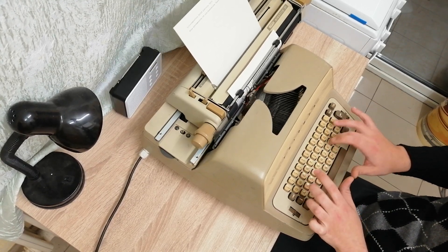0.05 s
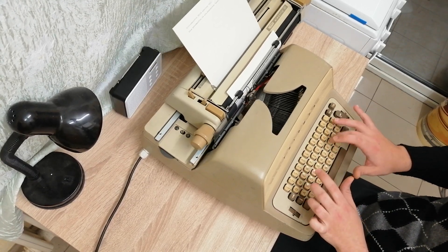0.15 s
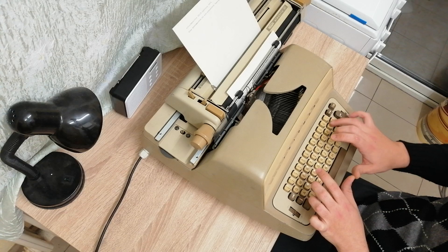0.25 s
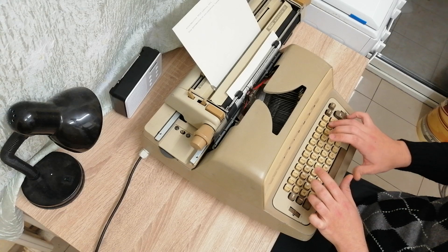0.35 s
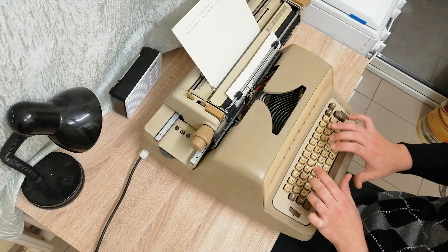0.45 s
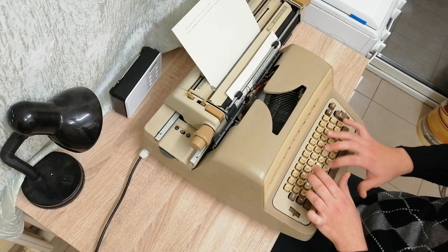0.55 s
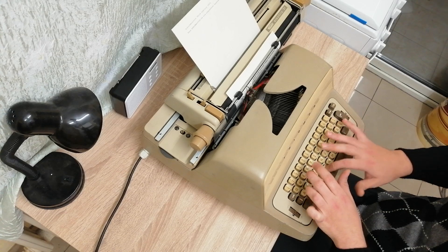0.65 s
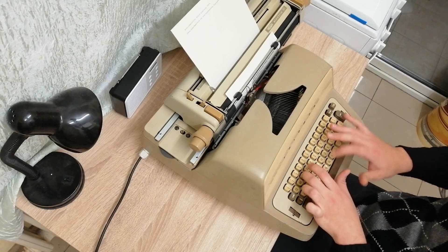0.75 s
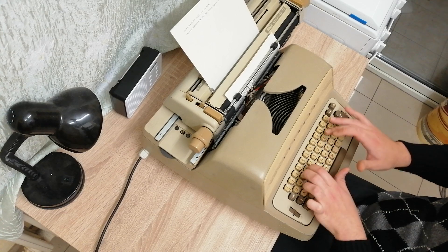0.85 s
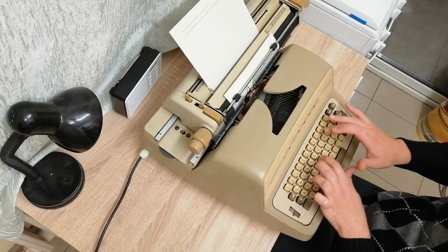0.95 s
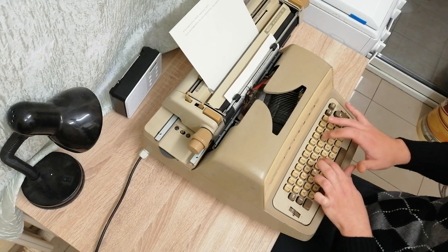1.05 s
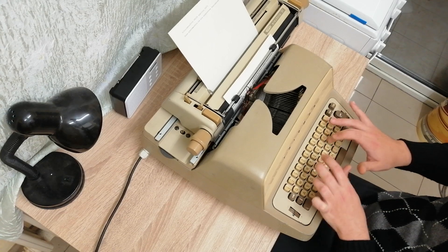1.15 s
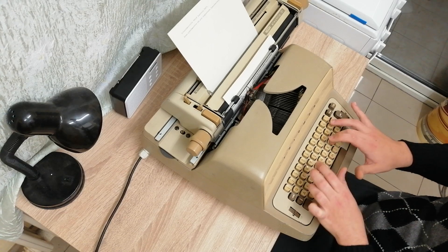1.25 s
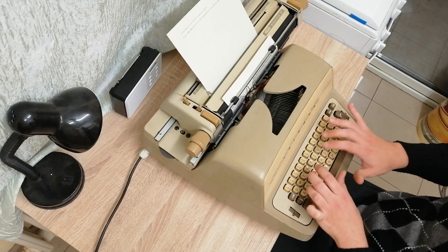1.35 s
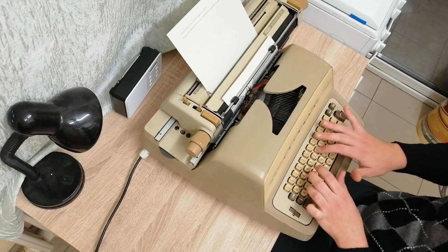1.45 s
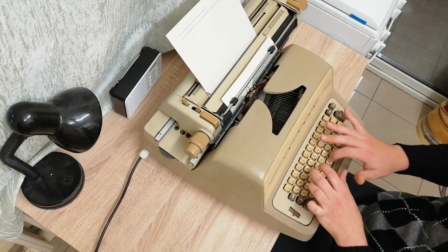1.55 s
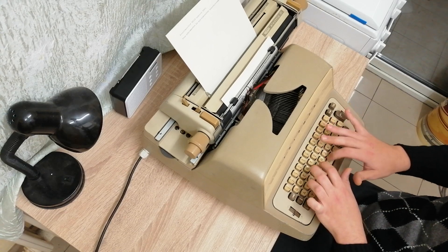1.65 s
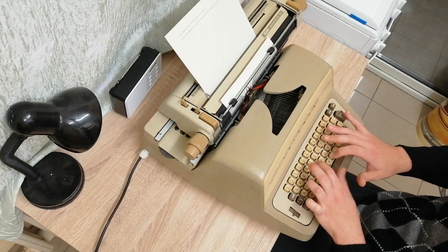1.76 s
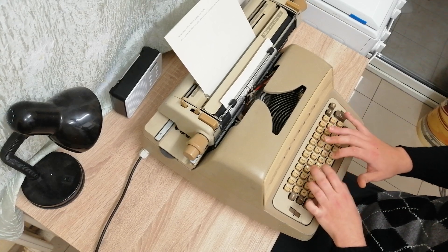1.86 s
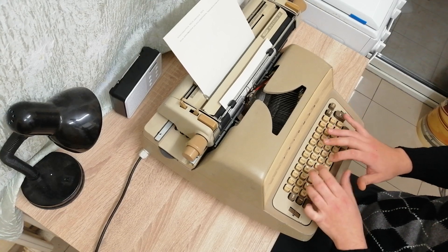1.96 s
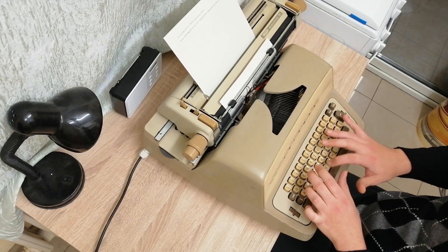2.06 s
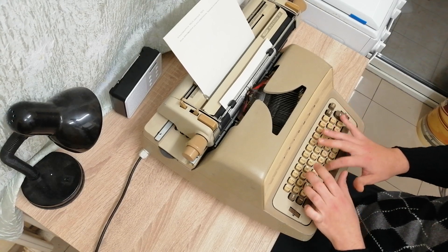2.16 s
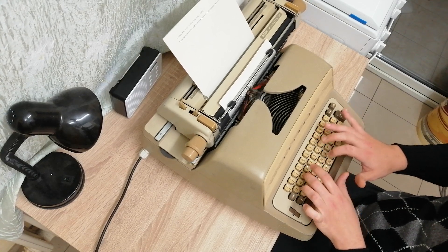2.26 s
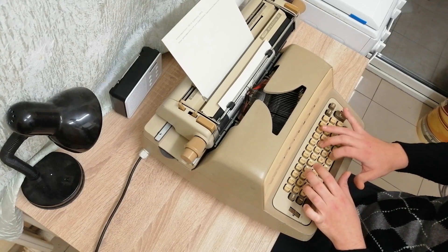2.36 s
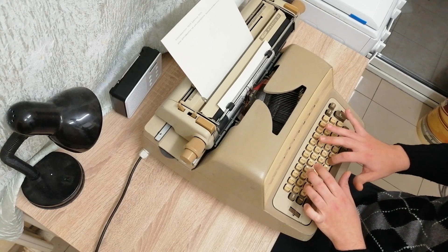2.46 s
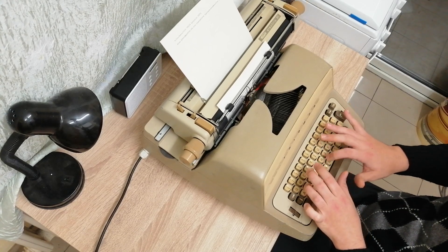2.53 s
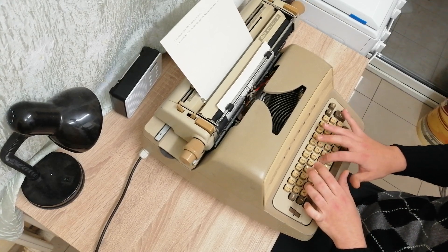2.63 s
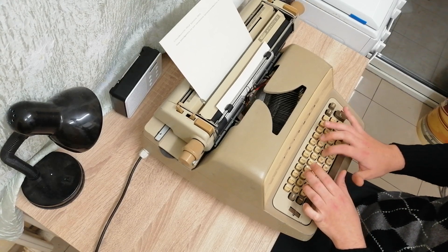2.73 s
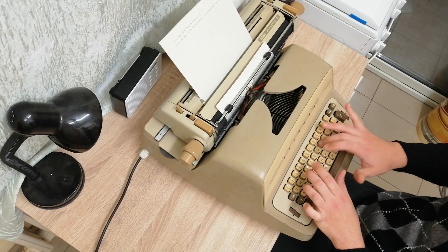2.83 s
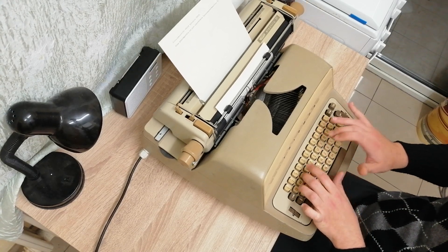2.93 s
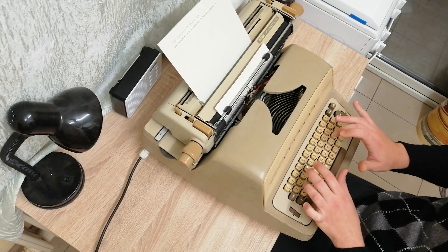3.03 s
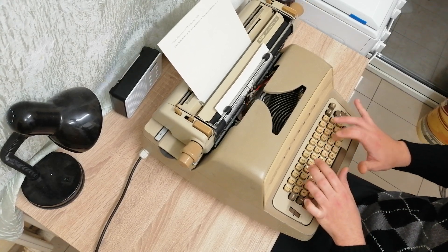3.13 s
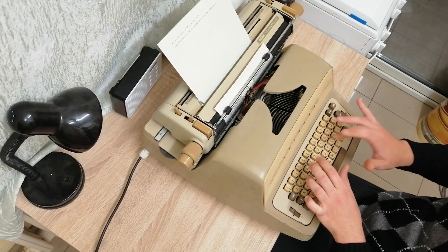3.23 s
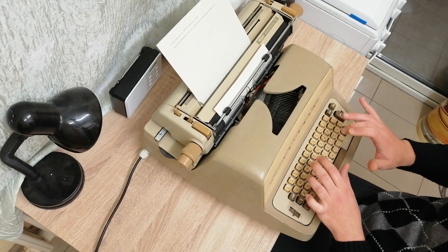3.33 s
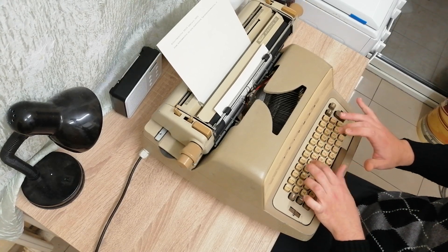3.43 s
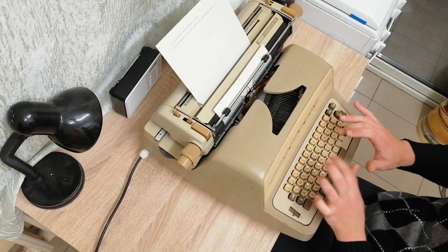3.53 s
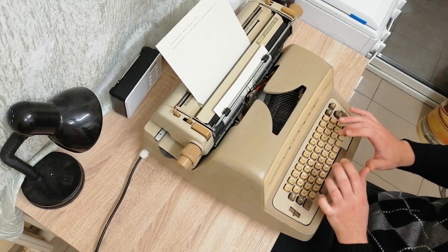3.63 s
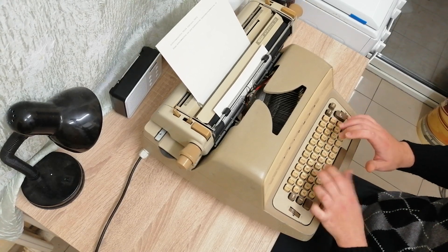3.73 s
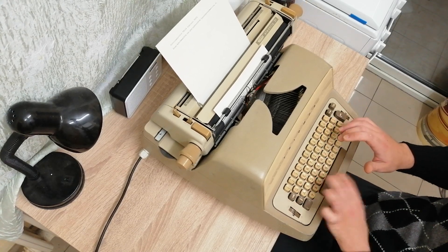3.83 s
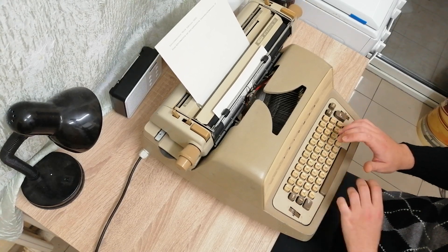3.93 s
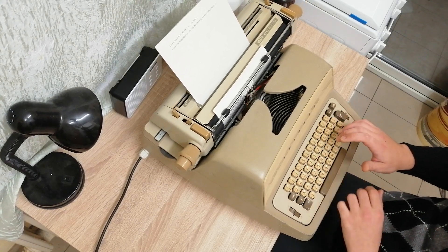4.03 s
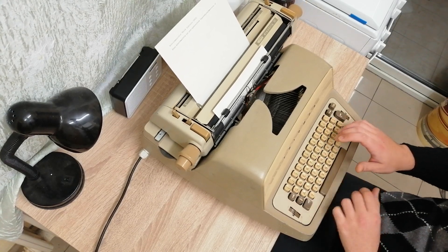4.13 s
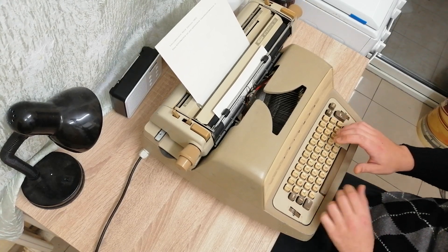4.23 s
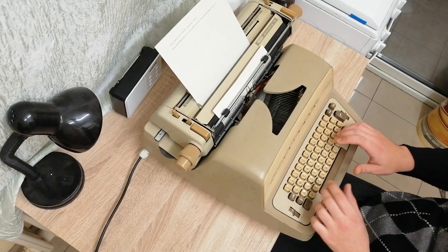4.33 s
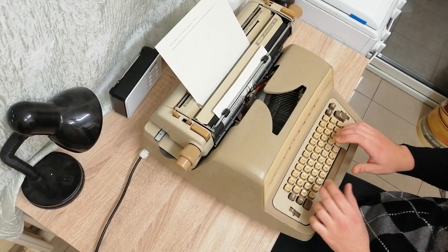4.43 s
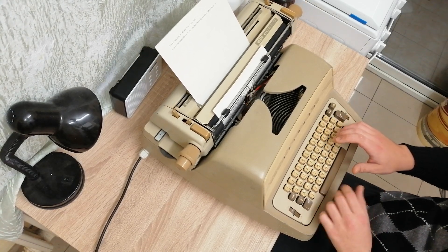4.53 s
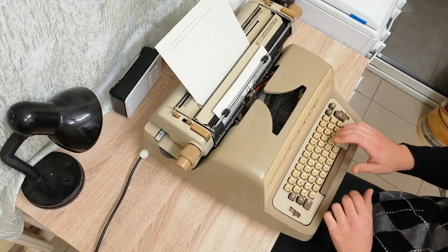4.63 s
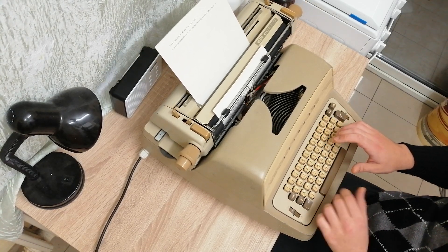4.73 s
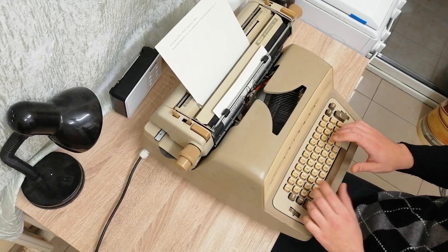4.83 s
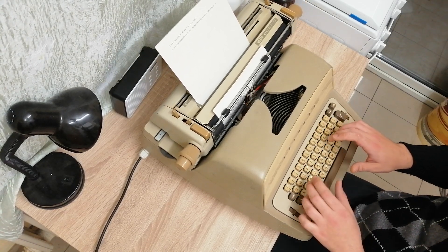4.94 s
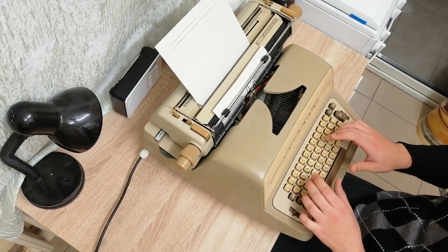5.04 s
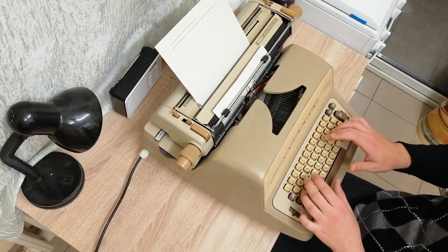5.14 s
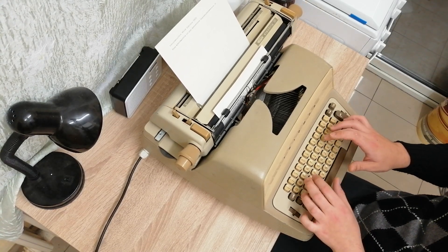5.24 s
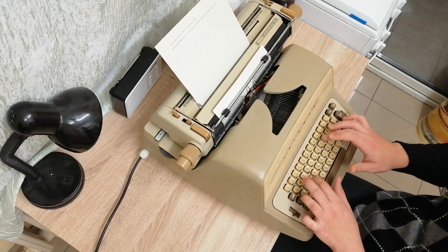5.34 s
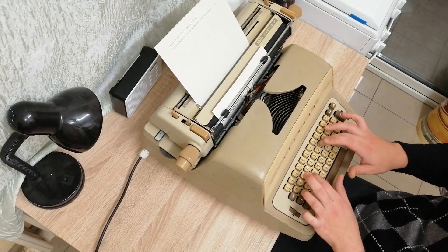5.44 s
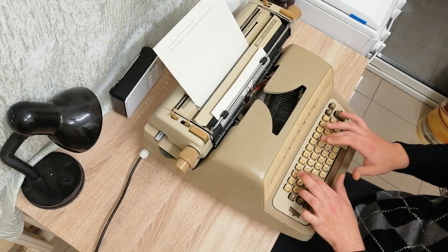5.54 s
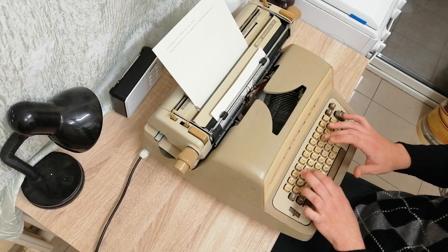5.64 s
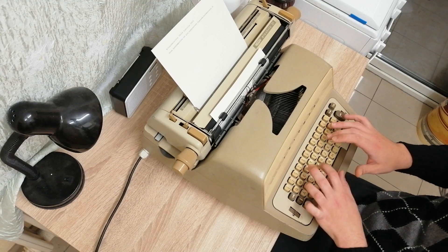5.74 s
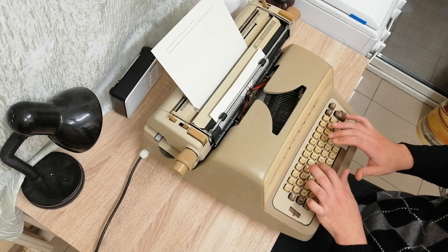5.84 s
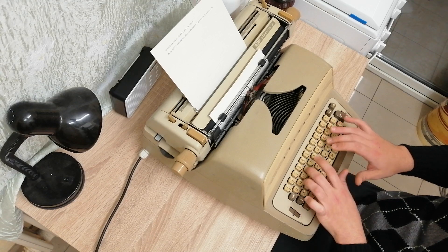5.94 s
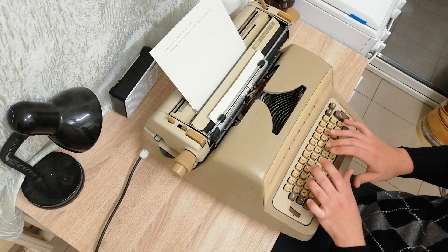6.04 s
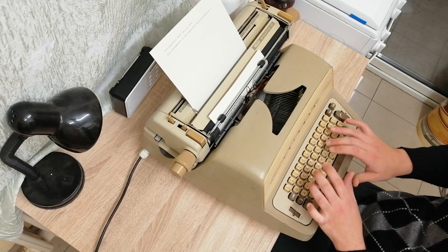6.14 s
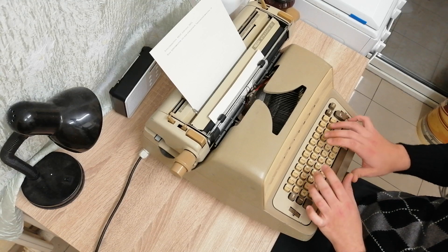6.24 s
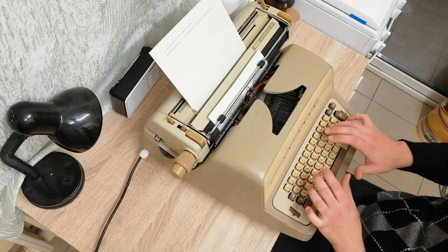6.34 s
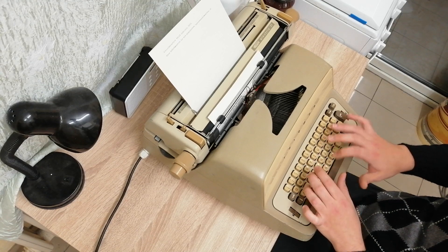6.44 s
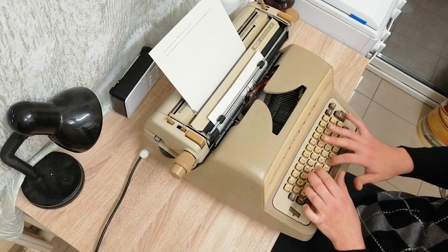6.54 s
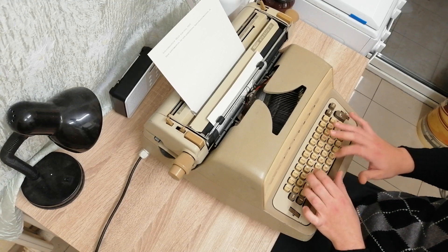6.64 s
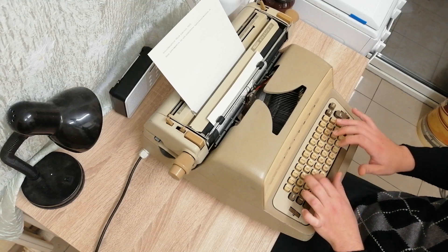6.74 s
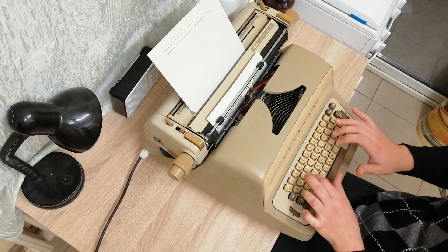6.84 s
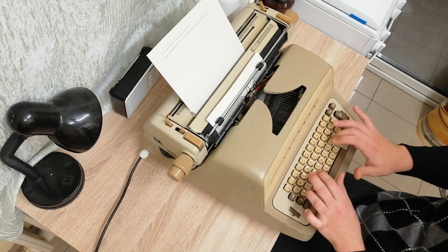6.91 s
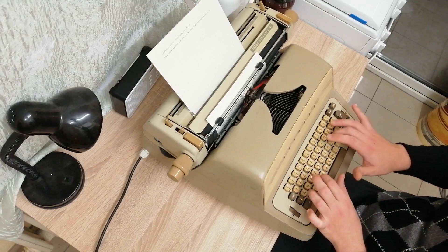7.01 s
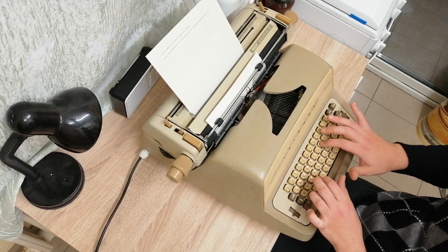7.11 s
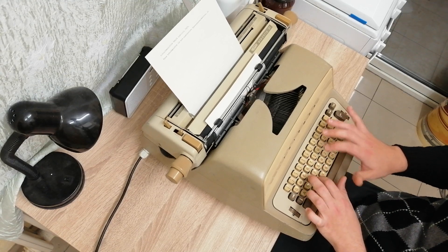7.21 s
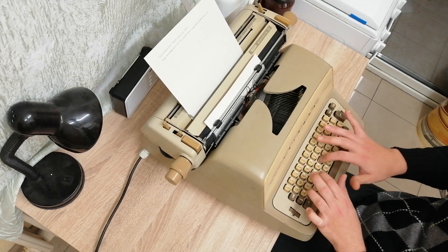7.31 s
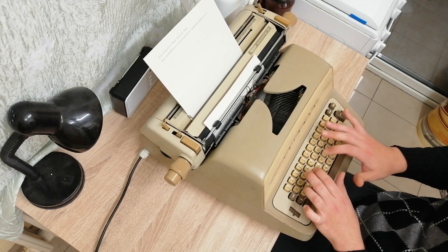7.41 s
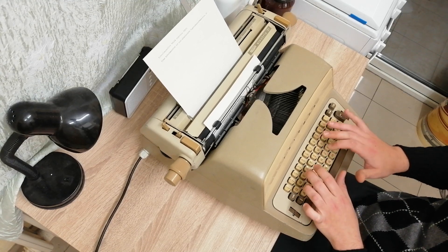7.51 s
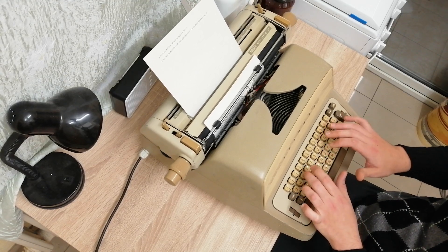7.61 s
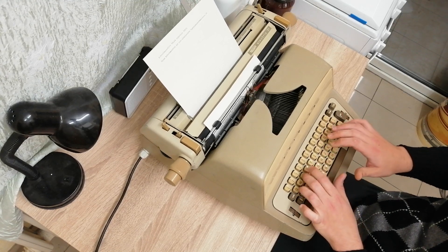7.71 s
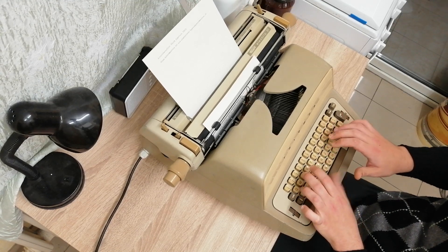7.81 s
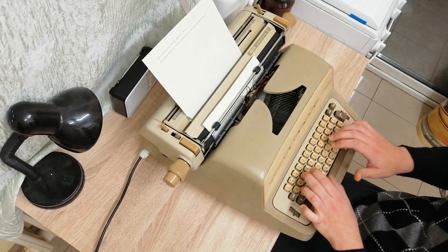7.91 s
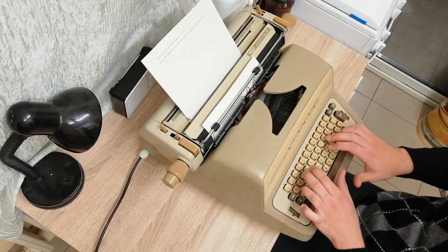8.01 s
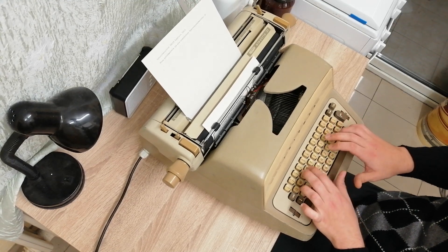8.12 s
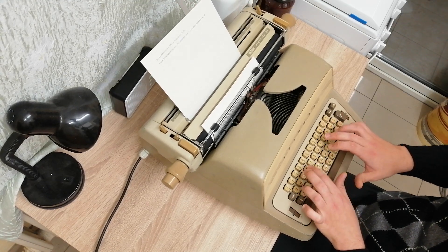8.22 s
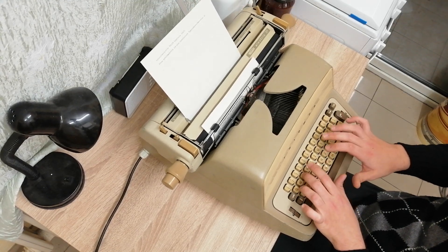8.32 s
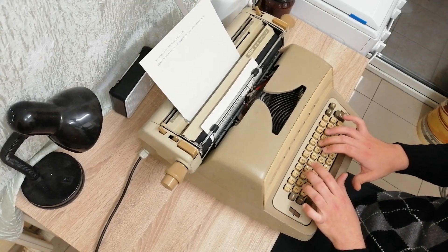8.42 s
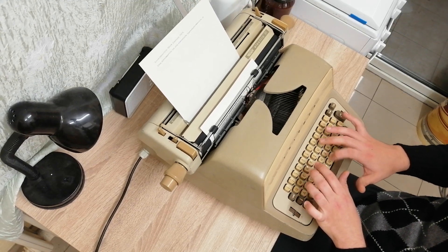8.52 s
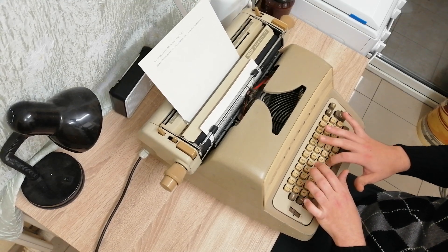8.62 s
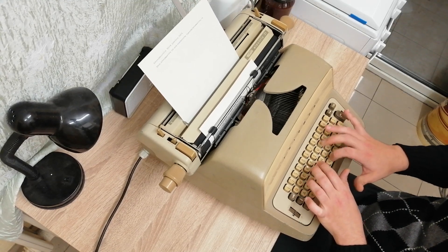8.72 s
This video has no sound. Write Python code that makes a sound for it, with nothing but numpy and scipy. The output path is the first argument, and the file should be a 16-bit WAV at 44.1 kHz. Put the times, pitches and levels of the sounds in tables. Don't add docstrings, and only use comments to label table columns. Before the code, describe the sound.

An electric typewriter works on a wooden desk in a small hard room, heard close and wide in stereo with short, bright echoes. A faint low motor hum and airy whirr run throughout, sinking in quiet gaps. After a small knock at the start, letters strike from 0.2 to 3.5 seconds, about six a second but uneven: key click, sharp steel crack, rattle, carriage clack, soft desk thud. A duller space-bar knock falls at 1.9. Typing then pauses; a space lands at 3.9, with small touches and soft finger rustles around 3.8 to 5.2. Strikes resume at 5.5, quick at first, more spaced around 6 to 7, with a space at 5.8, then quicker again. Fingers brush near 7.9, a space follows at 8.0, and heavy, low shift clunks land around 8.1 and 8.4 amid the last letters, ending near 8.7.

```python
import sys
import numpy as np
from scipy import signal
from scipy.fft import rfft, irfft
from scipy.io import wavfile
from scipy.ndimage import uniform_filter1d

SR = 44100
rng = np.random.default_rng(int(sys.argv[2]) if len(sys.argv) > 2 else 0)


def store_pcm(level_fs):
    pcm = np.round(np.clip(level_fs, -1, 1) * 32767).astype(np.int16)
    wavfile.write(sys.argv[1], SR, np.atleast_2d(pcm).T)


def voltage_ratio(level):
    return 10 ** (np.asarray(level, float) / 20)


N = 386757
EXPAND_DB = 11
STEP_S = .041

# frequency_hz, density_db [dB per Hz]
LINKAGE = [(180, -29), (300, -13.5), (526, -20), (835, -10.5), (1200, -14.5), (1730, -9.5), (3870, -15.5),
           (4420, -21), (5210, -14.5), (6570, -15), (8560, -16), (11300, -10), (15500, -33.5)]
# frequency_hz, likeness [-1 to 1]
LIKENESS = [(60, 1), (130, 0.98), (290, 0.76), (640, -0.13), (1410, -0.0028), (3100, -0.029),
            (6820, -0.028), (15000, 0.1)]


def evened(x):
    return x / np.sqrt(np.mean(x ** 2) + 1e-20)


def read(points, hz):
    f, value = np.transpose(points)
    return np.interp(np.log(hz + 1), np.log(f + 1), value)


def add(mix, s, sound):
    part = mix[max(round(s * SR), 0):][:len(sound)]
    part += sound[:len(part)]


def colour(points, warp=1):
    hz = abs(np.fft.fftfreq(2048, 1 / SR))
    log_gain = np.log(voltage_ratio(np.maximum(read(points, hz / warp), -80)))
    taps = np.fft.ifft(np.exp(np.conj(signal.hilbert(log_gain)))).real[:1024]
    return taps / np.linalg.norm(taps)


def ring(modes, warp=1):
    longest_s = max(t60 for hz, db, t60 in modes)
    t = np.arange(round(SR * .6 * longest_s) + 64) / SR
    taps = np.zeros(len(t))
    for hz, db, t60 in modes:
        taps += voltage_ratio(db - 60 * t / t60) * np.sin(2 * np.pi * hz * warp * t) / np.sqrt(t60)
    taps = taps * (1 - np.exp(-t / .00012))
    return taps / np.linalg.norm(taps)


def resonate(drive, modes, level_db):
    return voltage_ratio(level_db) * signal.oaconvolve(drive, ring(modes)[None], axes=1)[:, :N]


def pair(a, b, hz):
    # frequency_hz, left_minus_right_db
    left_lean = [(60, 1), (180, 0.5), (550, 0), (1650, 0), (4970, 1.5), (15000, -2.5)]
    same = np.clip(read(LIKENESS, hz), -1, 1)[:, None]
    lean = voltage_ratio(read(left_lean, hz) / 2)[:, None]
    return np.array([a * lean, (same * a + np.sqrt(1 - same ** 2) * b) / lean])


def clatter(db, spread_ms, first, rise_ms=0.11):
    ms = np.arange(6000) / SR * 1000
    sign, chance, size = rng.random((3, 6000))
    sizes = np.sign(sign - .5) * (chance < .08) * voltage_ratio(-4 * np.log(size + .01))
    shower = sizes * np.exp(-ms / max(spread_ms, .3)) * (1 - np.exp(-ms / max(rise_ms, .1)))
    shower = shower / np.linalg.norm(shower)
    shower[0] = first
    return voltage_ratio(db) * shower


def slow(rate):
    t = np.arange(0, N + 256, 256) / SR
    wave = np.zeros(len(t))
    for f in np.geomspace(rate / 12, rate, 12):
        wave += np.sin(2 * np.pi * (f * t + rng.random())) / np.sqrt(f)
    return np.interp(np.arange(N) / SR, t, evened(wave))


def motor():
    # frequency_hz, level_db
    hum_tones = [(101, -68), (140, -78.5), (199, -84.5), (301, -77), (399, -78), (650, -78), (800, -81.5),
                 (1590, -92), (2385, -79), (2800, -83), (3170, -84.5), (4010, -92)]
    # frequency_hz, density_db [dB per Hz]
    air_spectrum = [(15, -2.5), (28, 19), (58, -14), (100, -10), (145, -0.5), (300, -23), (530, -16),
                    (700, -20.5), (1250, -22.5), (2400, -22.5), (3400, -30.5), (5000, -35.5), (11000, -41),
                    (16000, -50)]
    frames, hz = N // 256 + 5, np.fft.rfftfreq(1024, 1 / SR)
    a, b, c, d, patches = rng.standard_normal((frames, 513, 5)).T
    patches = evened(uniform_filter1d(uniform_filter1d(patches, 10, 0), 10, 1))
    z = pair(a + 1j * b, c + 1j * d, hz) * voltage_ratio(read(air_spectrum, hz)[:, None] + 0.61 * patches)
    air = voltage_ratio(-58) * evened(signal.istft(z, nperseg=1024, noverlap=768)[1][:, :N])
    turned_s = np.cumsum(1 + .0008 * slow(6)) / SR
    tones = np.zeros((2, N))
    for tone_hz, db in hum_tones:
        lag = np.arccos(np.clip(read(LIKENESS, tone_hz), -1, 1)) * np.array([[.5], [-.5]])
        tones += voltage_ratio(db + 6 + 1.8 * slow(25)) * np.sin(2 * np.pi * (tone_hz * turned_s + rng.random()) + lag)
    return voltage_ratio(EXPAND_DB) * (air + tones)


def room():
    # delay_ms, left_db, right_db
    reflections = [(0, 7, 8), (2, -1, 2), (4.6, 2.5, 3.5), (6.9, -8, -8), (9.4, -0.5, -1),
                   (14.4, -3.5, -3.5)]
    # frequency_hz, t60_s
    decay_times = [(100, 0.65), (500, 0.28), (2000, 0.31), (6000, 0.31), (12000, 0.18)]
    taps = np.zeros((2, SR // 2))
    at = np.arange(120, SR // 2 - 12, 12) + rng.integers(0, 12, (2, (SR // 2 - 121) // 12))
    np.put_along_axis(taps, at, rng.choice([-1., 1.], at.shape), 1)
    hz, t, z = signal.stft(taps, SR, nperseg=256)
    z = z * voltage_ratio(-60 * t / read(decay_times, hz)[:, None])
    tail = signal.istft(z, SR, nperseg=256)[1]
    early = np.zeros_like(tail)
    for ms, *db in reflections:
        moved = rng.integers(0, 8, 2)
        early[[0, 1], round(ms * SR / 1000) + moved] += voltage_ratio(np.array(db))
    hz = np.fft.rfftfreq(tail.shape[1], 1 / SR)
    spectra = [rfft(part)[..., None] for part in (early, tail / np.linalg.norm(tail[0]))]
    return [irfft(pair(*z, hz)[..., 0])[:, :SR * 2 // 5] for z in spectra]


def desk_top(drive):
    # frequency_hz, level_db, t60_s
    desk_modes = [(60.7, -20, 0.16), (87.7, 5, 0.59), (144.5, 1, 0.24), (203.4, 0, 0.048), (263, -5, 0.041),
                  (296, -4.5, 0.2), (406.4, -9.5, 0.11)]
    return resonate(drive, desk_modes, 30)


def rustles(send):
    # start_s, level_db, rise_ms, spread_ms
    brushes = [(0.298, -69, 10, 26), (3.79, -49, 11, 36), (4.265, -23, 21, 40), (4.74, -32.5, 30, 33),
               (4.794, -29.5, 25, 34), (4.853, -38, 9.2, 16), (5.156, -30, 16, 25), (7.688, -37, 12, 30),
               (7.899, -18.5, 110, 40)]
    # frequency_hz, density_db [dB per Hz]
    skin = [(180, -47), (300, -20), (892, -12.5), (1490, -8.5), (2250, -8), (2520, -14), (3070, -13.5),
            (11000, -40), (15500, -46)]
    for s, db, rise_ms, spread_ms in brushes:
        send(s, clatter(db + 6, spread_ms, first=0, rise_ms=rise_ms), colour(skin))


def shift_basket():
    # start_s, level_db
    landings = [(8.07, -18), (8.084, -12), (8.115, -7), (8.137, -4.5), (8.297, -27.5), (8.338, -22),
                (8.367, -7), (8.409, -11.5)]
    # frequency_hz, level_db, t60_s
    basket_modes = [(67.4, -19.5, 0.12), (140.4, 2.5, 0.14), (249, -5.5, 0.73), (316, -11, 0.032),
                    (431, -15, 0.15), (680, -23, 0.03), (885, -14.5, 0.031)]
    drive = np.zeros((2, N))
    for k, (s, db) in enumerate(landings):
        add(drive[k % 2], s, clatter(db, 4, first=2.38))
    return resonate(drive, basket_modes, 16)


def knocks():
    # start_s, clatter_db, dullness [0-1],
    # desk_thud_db
    stray = [(0.0014, -20, 0.04, -17.5), (1.9896, -38.5, 0.7, -16.5), (2.0407, -48, 0.2, -33),
             (2.65, -47, 0.5, -44), (3.851, -30.5, 0.66, -59), (3.869, -24, 0.05, -49),
             (4.0298, -31, 0.9, -30), (4.2752, -29.5, 0.83, -52), (4.8, -63, 0.6, -45.5),
             (5.1321, -63, 0.34, -53), (7.5694, -37.5, 0.1, -26.5), (8.073, -13.5, 0.73, -24),
             (8.1182, -12.5, 0.6, -6.5), (8.1365, -34.5, 0, -14.5), (8.1995, -40, 0.4, -13),
             (8.299, -39, 0.86, -36), (8.3368, -24.5, 0.5, -8.5), (8.3658, -12, 0.1, -29),
             (8.3844, -15, 0.8, -15), (8.4594, -27, 0, -18.5)]
    # start_s, clatter_db, desk_thud_db of the carriage step
    spaces = [(1.918, -13.5, -20), (3.9086, -13.5, -27.5), (5.7572, -14, -18), (7.9739, -14, -21)]
    bars = [(s, db, .65, thud_db - 1.5) for s, db, thud_db in spaces]
    steps = [(s + STEP_S, db - 6, .93, thud_db) for s, db, thud_db in spaces]
    return sorted(stray + bars + steps)


def knocking(send, desk):
    # frequency_hz, density_db [dB per Hz]
    dull = [(180, -36.5), (300, -12.5), (756, -1), (1870, 3.5), (2100, 6.5), (2790, -4), (8420, -5),
            (11300, -35), (15500, -58)]
    # frequency_hz, level_db, t60_s
    bar_modes = [(398, 0, 2.2)]
    drive = np.zeros((2, N))
    for k, (s, db, dullness, thud_db) in enumerate(knocks()):
        share = np.clip(dullness, 0, 1)
        body = np.sqrt(1 - share) * colour(LINKAGE) + np.sqrt(share) * colour(dull)
        send(s, clatter(db + 6.5, 3.9, first=.3, rise_ms=0.88), body)
        add(desk[k % 2], s, clatter(thud_db - 10, 11, first=0.32))
        add(drive[k % 2], s, [voltage_ratio(db) * share])
    return resonate(drive, bar_modes, 9)


def letters(send, desk):
    # blow_s, blow_db, key_press_db
    strokes = [(0.1654, -1, -22.5), (0.3957, -6.5, -29.5), (0.725, -3.5, -21), (0.8441, -5, -13),
               (0.9552, -4.5, -20), (1.1227, -2, -20), (1.1987, -4, -12), (1.334, -3, -22),
               (1.5225, -2.5, -12.5), (1.6987, -2, -15), (1.8062, 0, -10.5), (2.2277, -4, -20),
               (2.3241, -9.5, -9), (2.4258, -4, -19), (2.5395, -4, -22), (2.7374, -2.5, -16.5),
               (2.8886, -4, -13.5), (3.0233, -6.5, -18), (3.2768, -4.5, -23.5), (3.5427, -5, -15.5),
               (5.4603, -3, -17.5), (5.5492, -3.5, -16), (5.6313, -4.5, -8), (5.891, -1.5, -14),
                     (6.0225, -6, -24.5), (6.3807, -3, -24), (6.6303, -3.5, -17), (6.8826, -2.5, -17.5),
                     (7.0524, -3, -17.5), (7.2105, -4, -15), (7.3129, -4, -19), (7.4237, -1.5, -16),
                     (7.796, -6, -18), (8.246, -3.5, -17.5), (8.4105, -13, -26), (8.5269, -4.5, -21),
                     (8.693, -2.5, -16.5)]
    # frequency_hz, level_db, t60_s
    crack_modes = [(2600, -9, .004), (5600, 0, .0022), (7000, 0, .0022), (10500, -2, .002)]
    # frequency_hz, density_db [dB per Hz]
    slug = [(180, -27), (300, -21.5), (641, -13.5), (2150, 5.5), (4280, -7), (5570, -3.5), (6460, 0),
            (7250, -25.5), (8560, -8.5), (11100, -5.5), (12100, -24), (14000, -10.5), (15500, -26)]
    # frequency_hz, density_db [dB per Hz]
    key = [(180, -22.5), (300, -3.5), (600, -18.5), (1200, -18), (1900, -8.5), (3200, -14.5), (7500, -15.5),
           (9500, -13), (13800, -23), (16000, -29)]
    key_s, trip_s, cam_s, blow_s, rest_s = -.0535, -.0455, -.0115, -.0004, .083
    thud_db = -27.5
    for k, (s, blow_db, key_db) in enumerate(strokes):
        near, far = desk[k % 2], desk[1 - k % 2]
        size = 1 + .04 * rng.uniform(-1, 1)
        slack_s = .003 * rng.uniform(-1, 1)
        cam_db = min(-6.5 - blow_db, -5.5)
        send(s + key_s, clatter(key_db - 8, 5, first=.3, rise_ms=1.2), colour(key, size))
        send(s + trip_s, clatter(key_db + 1.5, 10.5, first=.4, rise_ms=.8), colour(key, size))
        send(s + cam_s, clatter(cam_db + 3, 13, first=.03, rise_ms=4), colour(LINKAGE, size))
        add(near, s + cam_s, clatter(thud_db + 1, 46, first=0.32))
        send(s + blow_s, [voltage_ratio(blow_db + 5)], ring(crack_modes, size), wet_db=5.5)
        send(s + blow_s, clatter(-2.5 + .13 * blow_db, 4.6, first=0.0105), colour(slug, size))
        send(s + STEP_S + slack_s, clatter(-5, 15, first=.15, rise_ms=1.5), colour(LINKAGE, size))
        add(near, s + STEP_S, clatter(thud_db, 20, first=0.46, rise_ms=3.5))
        add(far, s + rest_s, clatter(thud_db - 6, 23.3, first=0.13, rise_ms=6.5))


def typewriter():
    heard, desk = np.zeros((N, 2)), np.zeros((2, N))
    spots = [room() for k in range(10)]

    def send(s, drive, body, wet_db=14.5):
        early, tail = spots[rng.integers(len(spots))]
        struck = np.convolve(drive, body)[None]
        add(heard, s, signal.fftconvolve(struck, early + voltage_ratio(wet_db) * tail, axes=1).T)

    rustles(send)
    ends = shift_basket() + knocking(send, desk)
    letters(send, desk)
    a, b = ends + desk_top(desk)
    apart = signal.lfilter(*signal.butter(2, 400, "high", fs=SR), a - b)
    return heard.T + a + b + apart * np.array([[.9], [-.9]])


def scene():
    return voltage_ratio(-4.5) * typewriter() + motor()


def held(power_db, fall_db_per_s):
    fall = np.arange(N) * fall_db_per_s / SR
    return np.maximum.accumulate(power_db + fall) - fall


def top_cut(x):
    return signal.sosfilt(signal.butter(12, 16480, fs=SR, output="sos"), x)


def record(dry):
    dry = signal.sosfilt(signal.butter(2, 70, "high", fs=SR, output="sos"), dry)
    dry = signal.sosfilt(signal.cheby1(12, .5, 15400, fs=SR, output="sos"), dry)
    power_db = 10 * np.log10(abs(uniform_filter1d((dry ** 2).mean(0), 600)) + 1e-12)
    cut_db = np.clip(1.76 * (-39 - held(power_db, 250.)), 0, EXPAND_DB)
    cut_db *= 1 - 0.012 * np.clip(held(power_db, 39.0) + 55.0, 0, 40)
    out = dry / voltage_ratio(uniform_filter1d(cut_db, 300))
    out = 1.15 * np.tanh(out / 1.15)
    return top_cut(out)


dry = scene()
out = record(dry)
store_pcm(out)
```